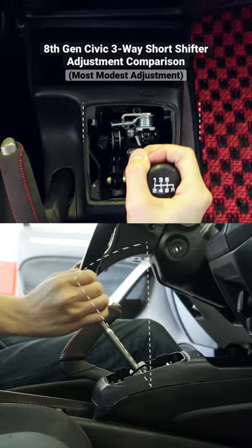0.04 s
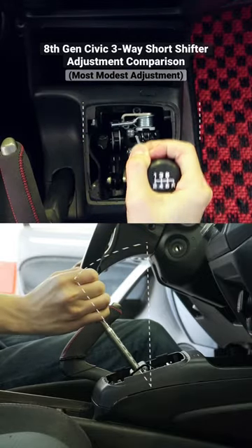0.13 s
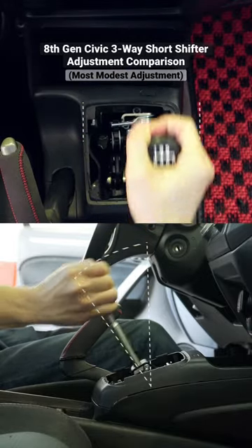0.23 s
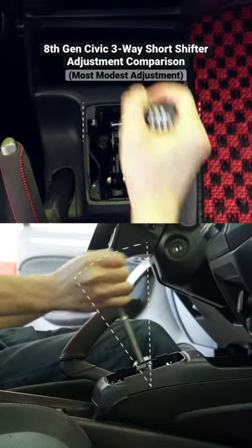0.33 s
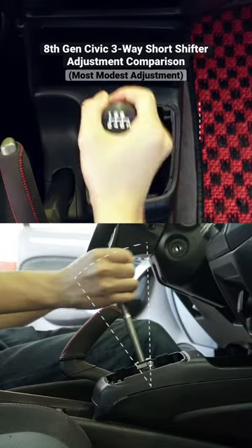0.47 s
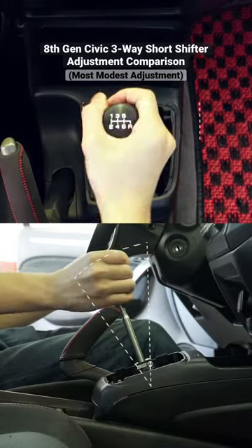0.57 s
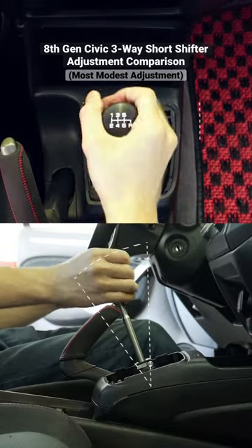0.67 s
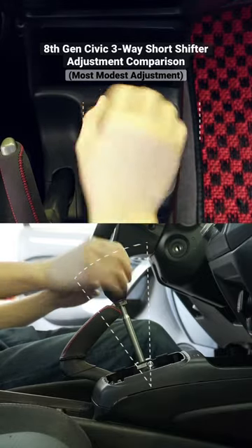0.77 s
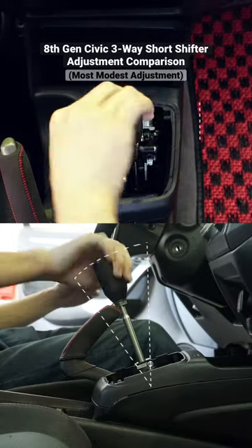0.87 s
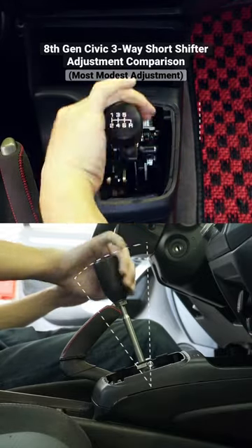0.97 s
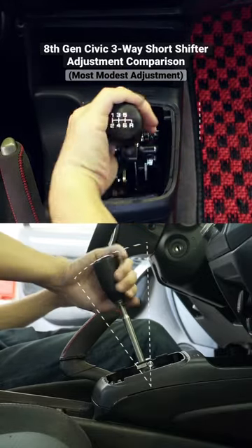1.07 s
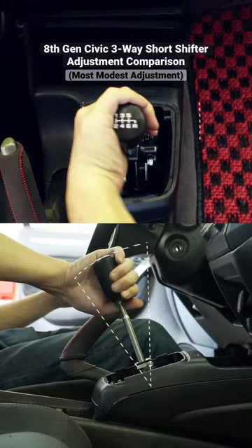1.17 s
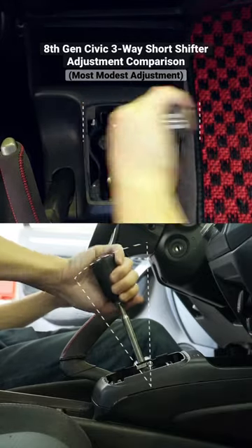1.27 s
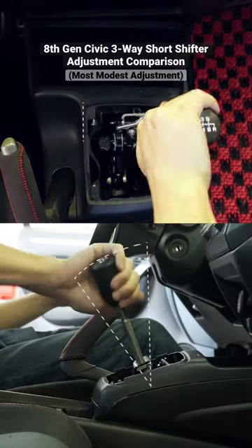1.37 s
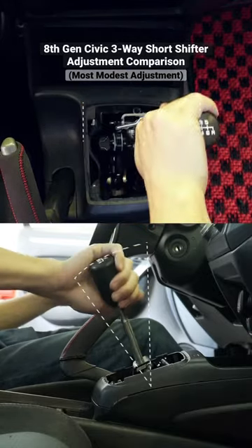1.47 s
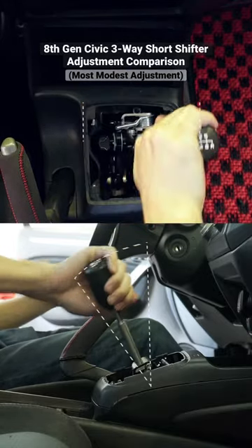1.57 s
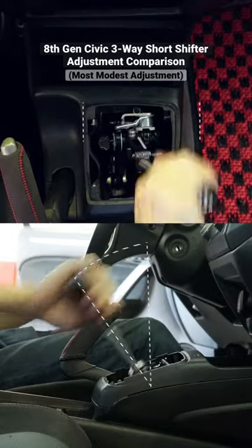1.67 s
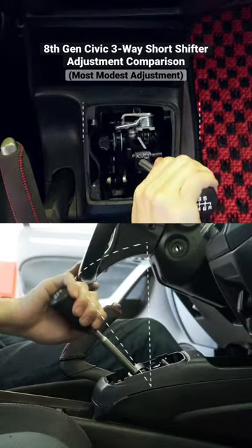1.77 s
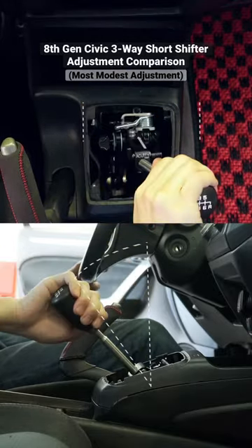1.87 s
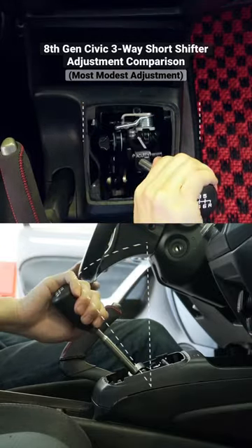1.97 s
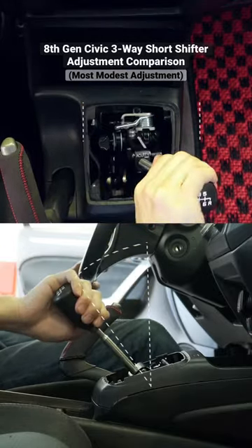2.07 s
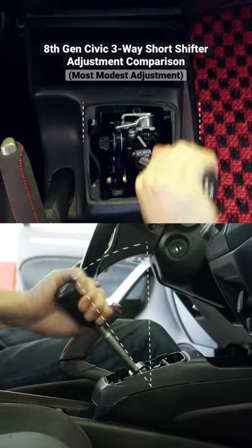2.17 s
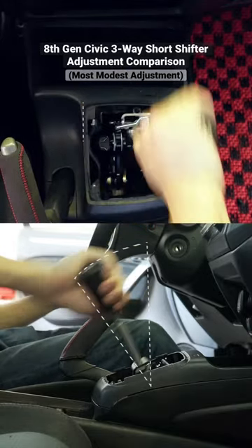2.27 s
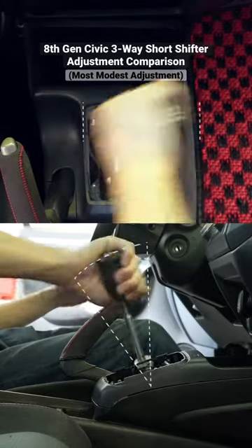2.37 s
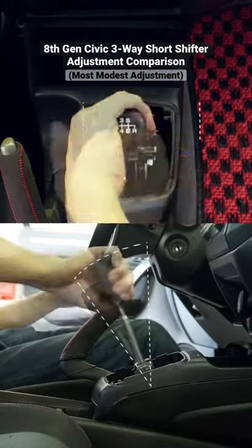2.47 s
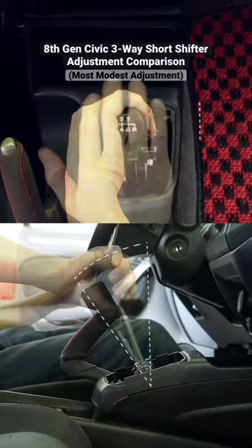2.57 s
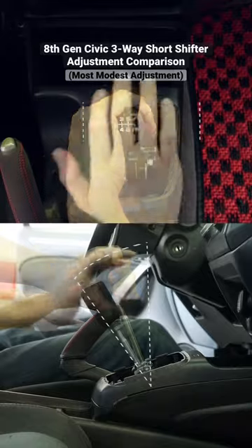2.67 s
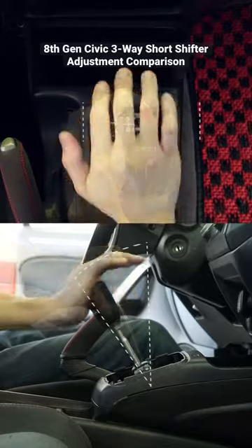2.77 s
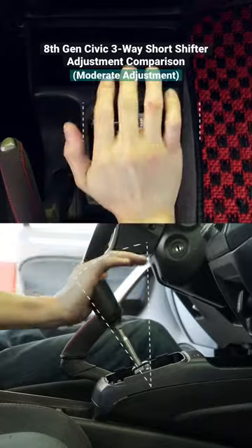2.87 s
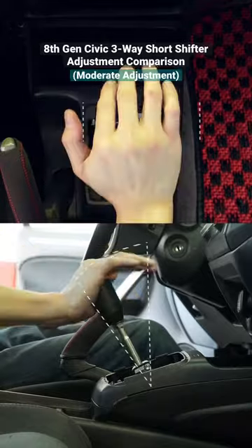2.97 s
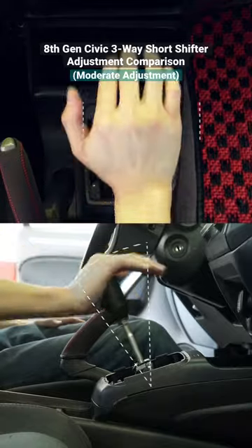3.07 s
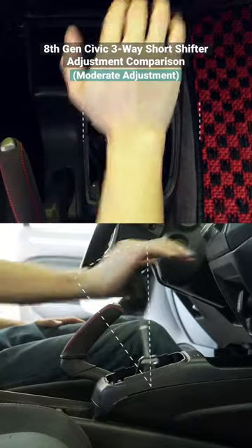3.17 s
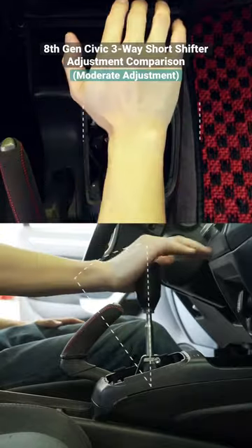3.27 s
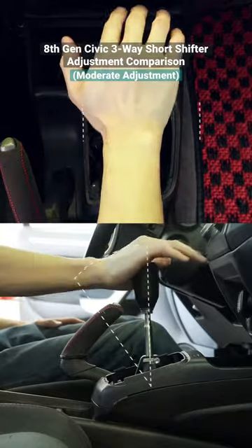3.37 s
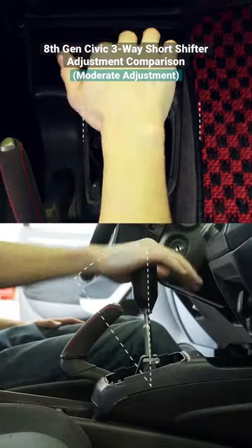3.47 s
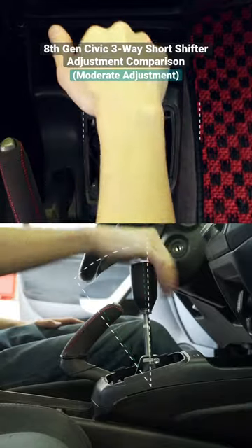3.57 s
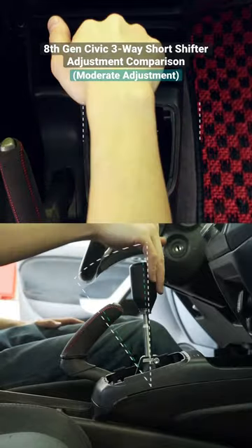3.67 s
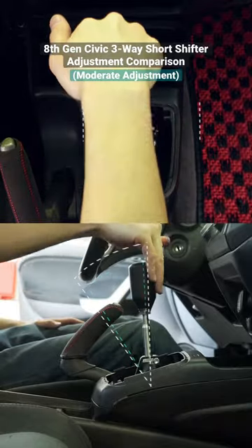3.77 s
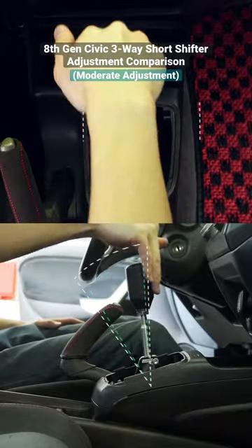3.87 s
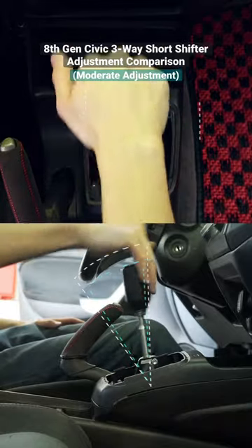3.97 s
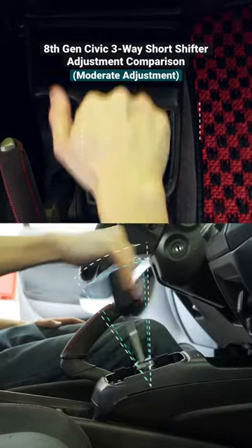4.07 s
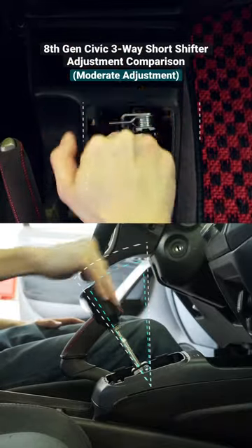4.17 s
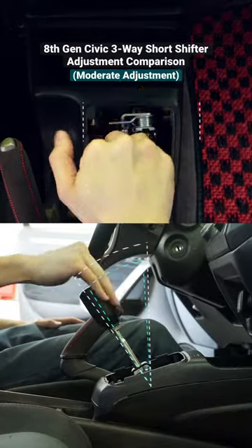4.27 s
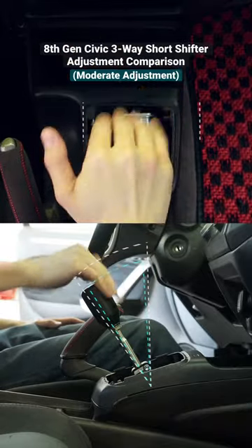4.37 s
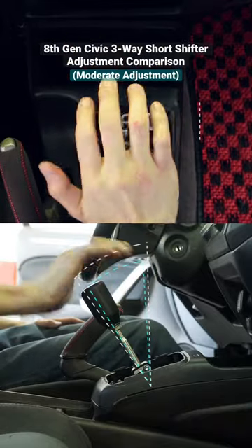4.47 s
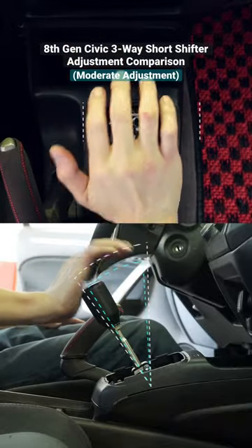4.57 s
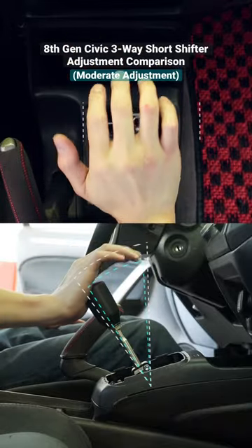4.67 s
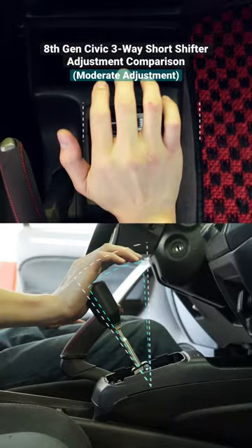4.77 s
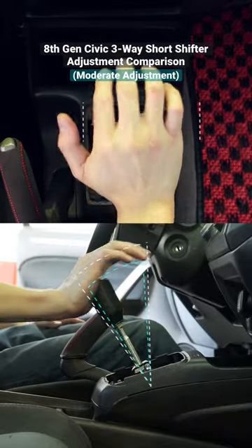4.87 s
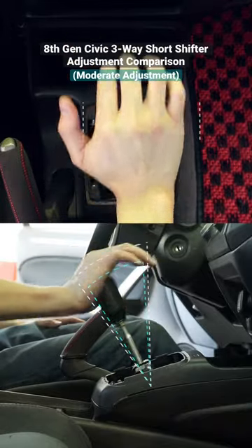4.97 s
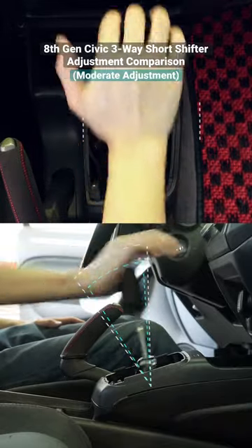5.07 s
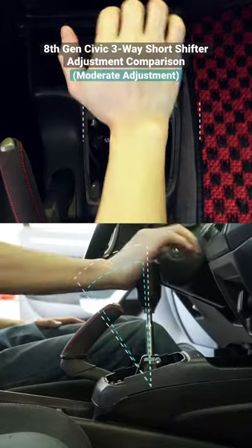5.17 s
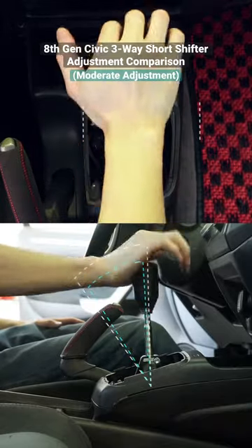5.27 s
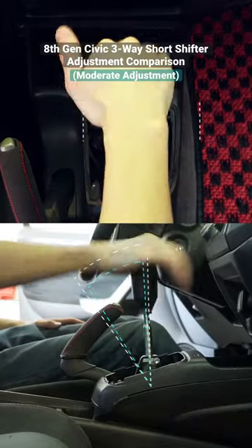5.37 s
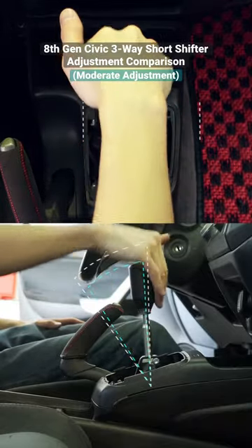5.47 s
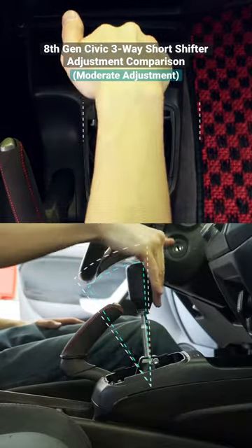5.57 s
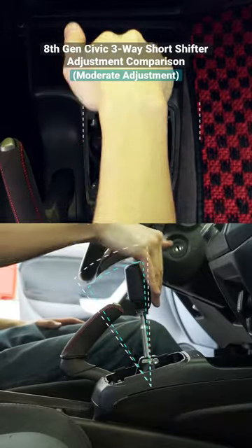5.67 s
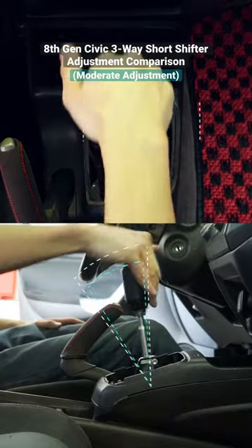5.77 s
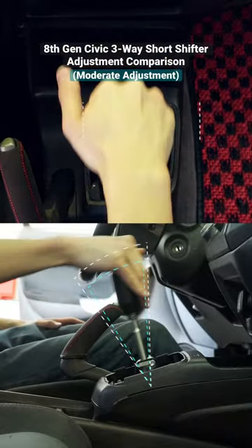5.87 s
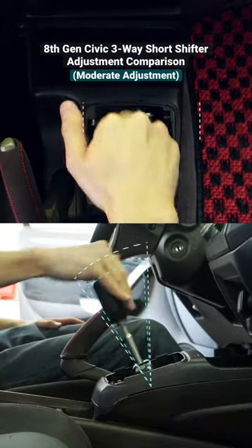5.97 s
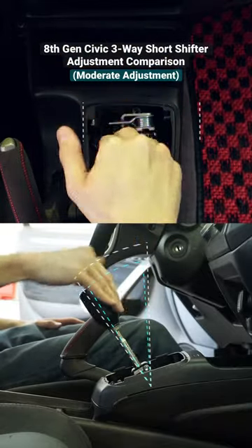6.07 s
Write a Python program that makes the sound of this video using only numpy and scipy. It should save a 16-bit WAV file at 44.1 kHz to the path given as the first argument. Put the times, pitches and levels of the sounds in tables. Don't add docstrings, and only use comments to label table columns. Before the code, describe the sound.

A hand-held microphone near the lever catches dry linkage ticks and low thumps in the console, while the gearbox's steel clacks return as dense garage echo. Early shifts are modest, reverse cracks sharply, and later shifts are paired snap-and-clunk blows, loudest just after three and four seconds. Low cabin rumble, slight hiss and remote traffic continue underneath.

```python
import sys
import numpy as np
from scipy import signal
from scipy.fft import rfft, irfft, next_fast_len
from scipy.io import wavfile
from scipy.ndimage import uniform_filter1d

SR = 44100
rng = np.random.default_rng(int(sys.argv[2]) if len(sys.argv) > 2 else 0)


def nominal_scale(level):
    x = np.asarray(level, float) / 20
    return 10 ** x


def unload_wav(signal):
    wavfile.write(
        sys.argv[1],
        SR,
        np.round(np.clip(np.atleast_2d(signal).T, -1, 1) * 32767).astype(np.int16),
    )


N = 270333


def read(table, hz):
    at, value = np.transpose(table)
    return np.interp(np.log(np.maximum(hz, 1)), np.log(at), value)


def shape(x, gain):
    y = irfft(rfft(x) * gain(np.fft.rfftfreq(x.shape[-1], 1 / SR)), x.shape[-1])
    return y / np.sqrt(np.mean(y ** 2))


def colour(table):
    below = (table[0][0] / 2, table[0][1] - 30)
    above = (table[-1][0] * 2, table[-1][1] - 30)
    ends = [below] + list(table) + [above]
    return lambda hz: nominal_scale(read(ends, hz))


# (frequency [Hz], correlation [0-1])
CHANNEL_LIKENESS = [(100, 0.99), (300, 0.93), (700, 0.73), (2000, 0.64), (5000, 0.6), (9000, 0.35),
                    (13000, 0.32)]


def pair(size, gain):
    like = np.clip(read(CHANNEL_LIKENESS, np.fft.rfftfreq(size, 1 / SR)), 0, 1)
    mid, side = rfft(rng.standard_normal((2, size)))
    mid = mid * np.sqrt(1 + like)
    side = side * np.sqrt(1 - like)
    return shape(irfft(np.array([mid + side, mid - side]), size), gain)


def steady(table):
    return pair(next_fast_len(N), colour(table))[:, :N]


def walk(rate):
    hold = int(SR / rate)
    levels = np.repeat(rng.standard_normal(N // hold + 1), hold)
    return 1.3 * uniform_filter1d(uniform_filter1d(levels, hold), hold)[:N]


def add(track, s, x):
    i = max(int(s * SR), 0)
    track[i:i + len(x)] += x[:len(track) - i]


def ring(t, modes):
    return sum(nominal_scale(db) * np.sin(2 * np.pi * hz * t) * 1000 ** (-t / t60) for hz, db, t60 in modes)


def afterglow(events, t60):
    kicks = np.zeros(N)
    for s, db, *_ in events:
        kicks[int(s * SR)] += nominal_scale(2 * db)
    return signal.lfilter([1], [1, -1000 ** (-2 / (t60 * SR))], kicks)


# (frequency [Hz], density [dB per Hz])
HISS_COLOUR = [(2000, -20), (5000, 2.5), (12000, -2.5), (15500, 0.5)]


def hiss():
    return nominal_scale(-76.5) * steady(HISS_COLOUR)


# (time [s], tyre wash [dB], nearness [dB], left minus right [dB])
TRAFFIC_LEVELS = [(0.0, -48.5, -1.5, 0.5), (0.3, -62.5, 3, -6), (0.68, -58.5, -5, -2),
                  (1.07, -62, -4.5, -0.5), (1.55, -58.5, -4.5, -4), (2.05, -61, -2.5, 2),
                  (2.61, -53.5, -4, -1.5), (2.87, -51.5, 0.5, -1), (3.1, -51.5, -2, -2),
                  (3.46, -49, 0, -3.5), (3.67, -47, -1.5, 0), (3.95, -49.5, 2.5, -2.5), (4.3, -45, 4, -1.5),
                  (4.5, -45, 6, -1.5), (4.74, -49.5, 4.5, -2), (4.95, -49.5, 0, -2), (5.5, -57, -5, -1.5),
                  (5.8, -60.5, -3.5, -2.5), (6.13, -56, -3.5, 0.5)]


def traffic():
    s, *controls = np.transpose(TRAFFIC_LEVELS)
    return [np.interp(np.arange(N) / SR, s, control) for control in controls]


# (frequency [Hz], density [dB per Hz])
CABIN_BOOM = [(90, -19.5), (150, 5.5), (230, 5.5), (310, -1.5), (480, -9.5), (700, -44)]
# (frequency [Hz], density [dB per Hz])
FLOOR_RUMBLE = [(25, -17), (45, -5), (65, -2.5), (100, -6.5), (140, -20)]
# (time [s], level [dB])
LOW_SWELL = [
    (0.9, -2.5),
    (2.4, -3.5),
    (3.5, -3.5),
    (3.95, -0.5),
    (5.0, -1.5),
    (5.7, -9),
]


def cabin_and_floor():
    tyre_db = traffic()[0]
    blows = GEAR_THUDS + GATE_THUDS + HAND_NUDGES
    low_swell_db = np.interp(np.arange(N) / SR, *np.transpose(LOW_SWELL))
    wash_db = 0.3 * (tyre_db - tyre_db.mean())
    boom_power = nominal_scale(2 * (-59.5 + low_swell_db + wash_db)) + nominal_scale(2 * -29) * afterglow(blows, 0.97)
    rumble_power = nominal_scale(2 * (-66.5 + low_swell_db)) + nominal_scale(2 * -31.5) * afterglow(blows, 0.95)
    boom = steady(CABIN_BOOM) * np.sqrt(boom_power) * nominal_scale(1.8 * walk(13))
    rumble = steady(FLOOR_RUMBLE) * np.sqrt(rumble_power) * nominal_scale(2 * walk(38))
    return boom + rumble


# (frequency [Hz], density [dB per Hz])
TYRE_COLOUR = [(210, -38.5), (350, -11), (385, -19), (472, -7.5), (555, -15.5), (719, -11.5), (1020, -2),
               (1220, -5), (1420, -9.5), (2340, -13), (2540, -16.5), (4560, -26), (5670, -34.5),
               (9000, -61), (11700, -90), (19800, -120)]


def tyre_wash():
    tyre_db, near_db, pan_db = traffic()
    size = next_fast_len(N)
    road = rfft(pair(size, colour(TYRE_COLOUR)))
    centres_hz = [600, 1050, 1700, 3200]
    band_db = [-0.5 * near_db, near_db, 0, -1 - 0.13 * near_db]
    tyres = 0
    for row, db in zip(np.eye(4), band_db):
        share = read(list(zip(centres_hz, row)), np.fft.rfftfreq(size, 1 / SR))
        tyres = tyres + irfft(road * share, size)[:, :N] * nominal_scale(db + walk(14))
    return tyres * nominal_scale(tyre_db + np.array([pan_db, -pan_db]) / 2)


# (frequency [Hz], density [dB per Hz])
FAR_WALL = [(500, -8), (1100, -1.5), (2300, -1), (4500, -6.5), (7000, -26)]


def far_end():
    return steady(FAR_WALL) * np.sqrt(afterglow(SEATING_CLACKS, 0.96)) * nominal_scale(-20.5)


# (time [s], peak [dB], ring [Hz], edge above 6 kHz [dB], decay [s])
LINKAGE_TICKS = [(0.6444, -51, 1780, -20, 0.03), (0.6658, -43, 1720, -12, 0.02),
                 (0.7045, -41.5, 1760, -7, 0.016), (0.738, -50, 1720, -9, 0.02),
                 (0.748, -54, 1720, -5, 0.02), (1.1753, -33.5, 1706, 2, 0.035),
                 (1.2902, -44, 2170, -21.5, 0.045), (1.314, -29.5, 1600, -18, 0.05),
                 (1.57, -47, 1660, -11.5, 0.01), (1.658, -44, 1500, -1.5, 0.02),
                 (1.689, -30, 3400, 5, 0.071), (2.307, -27, 3400, -8.5, 0.04),
                 (2.7414, -48, 1660, -12, 0.021), (3.11, -36, 1500, -15, 0.03),
                 (3.9515, -44, 1680, -41, 0.022), (4.068, -37, 1300, -20.5, 0.033),
                 (5.773, -46, 2240, -14, 0.025)]


def linkage():
    t, out = np.arange(4096) / SR, np.zeros(N)
    for s, db, hz, edge_db, decay_s in LINKAGE_TICKS:
        spectrum = [(500, -4.5), (1200, 7.5), (3000, -2.0), (5500, -1.0),
                    (8000, edge_db), (11000, edge_db - 14.5), (15000, 2 * edge_db - 15)]
        crack = shape(rng.standard_normal(len(t)), colour(spectrum)) * 1000 ** (-t / decay_s)
        small_ring = ring(t, [(hz, 0, 0.85 * decay_s)]) * (1 - np.exp(-t / 0.00092))
        tick = 0.62 * crack + 0.88 * small_ring
        add(out, s, nominal_scale(db) * tick * (1 - np.exp(-t / 0.00093)))
    return out


# (time [s], pitch [Hz], level [dB], t60 [s])
SINGING_PARTS = [(0.35, 2520, -39, 0.31), (.355, 4470, -40, .35), (1.28, 433, -39.5, 0.51),
                 (2.308, 3450, -21, 0.13), (2.31, 2130, -29, 0.5), (3.124, 4300, -36, 0.33),
                 (4.08, 4200, -38, 0.23), (4.076, 2700, -40, .3), (4.146, 480, -27, 0.12),
                 (4.153, 1290, -30.5, 0.62), (4.18, 2580, -29.5, 0.53), (4.17, 3500, -39, 0.22),
                 (4.215, 440, -40, 0.53), (1.7, 1070, -34.5, 0.45), (5.898, 2900, -35, .4),
                 (1.75, 4100, -31.5, 0.81), (6.008, 4400, -38, .3), (6.015, 2900, -35, 0.7)]


def singing():
    size = SR // 2
    t, out = np.arange(size) / SR, np.zeros((2, N))
    for s, hz, db, t60 in SINGING_PARTS:
        cluster = 0.7 * pair(size, lambda f: 1 / (1 + ((f - hz) / (40 + 0.034 * hz)) ** 4))
        if hz < 3000:
            cluster = cluster + 0.45 * np.sin(2 * np.pi * hz * t)
        envelope = (1 - np.exp(-t / 0.004)) * 1000 ** (-t / t60)
        for track, x in zip(out, cluster):
            add(track, s, nominal_scale(db) * x * envelope)
    return out


# (frequency [Hz], level [dB], t60 [s])
FLOOR_PAN = [(46, -2.5, 0.17), (72.3, 5, 0.2), (103.4, 0, 0.33)]
CONSOLE_BODY = [(162.2, -8, 0.17), (231.3, -5.5, 0.12), (290, -5, 0.15)]
UPPER_PANELS = [(342, -11, 0.03), (440, -15, 0.1), (478.6, -16.5, 0.1), (566.7, -22.5, 0.16),
                (650, -28, 0.059), (814, -34, 0.081), (1088, -16.5, 0.04)]
# (time [s], peak [dB], ring [Hz], upper panels [dB], shake [ms])
GEAR_THUDS = [(0.346, -28.5, 206, 1, 19), (0.394, -31, 305, 4, 17), (0.408, -28, 165, -3, 12),
              (0.433, -21.5, 217, 5, 12), (0.457, -22, 175, 5, 12), (0.46, -27, 290, 0.5, 12),
              (0.476, -33, 130, 0, 12), (3.11, -27, 191, 2, 15), (3.135, -30, 170, -5, 16),
              (3.162, -21.5, 240, -1, 11), (3.166, -25.5, 155, -2, 14), (3.18, -21.5, 255, 7, 10),
              (3.189, -18, 165, 0, 27), (3.226, -29, 219.5, 1, 8.3), (4.068, -28, 176.7, 2.5, 15),
              (4.076, -32.5, 480, 0, 11), (4.099, -32.5, 163, -2, 13), (4.14, -28.5, 192, 8, 7.8),
              (4.156, -19, 292, 12, 14.7), (4.158, -17.5, 157, -4, 25), (4.192, -27.5, 222, 4.5, 13.5),
              (5.036, -28.5, 205, 5, 17), (5.058, -31, 220, 1, 10), (5.082, -27, 290, 4, 6),
              (5.086, -21, 219, 6, 13), (5.11, -19, 156.3, 4, 31), (5.902, -26.5, 482, 3, 19),
              (5.904, -29, 290, -3, 13), (5.916, -37, 80, -5, 18), (5.996, -29.5, 480, 4, 14),
              (6.016, -24.5, 467, -4, 17), (6.016, -16, 155.3, 2.5, 26), (6.02, -27, 340, -2, 12),
              (6.036, -28, 270, 0, 12), (6.058, -30.5, 272, -3, 16), (6.088, -31.5, 160, 4, 18),
              (6.11, -31.5, 115, -5, 14)]
# (time [s], peak [dB], ring [Hz], upper panels [dB], shake [ms])
GATE_THUDS = [(1.207, -37, 200, -12, 8), (1.252, -37, 138, -3, 14), (1.222, -37, 170, -12, 8),
              (1.24, -40, 170, -12, 6), (1.281, -30, 190, -14, 8), (1.298, -26, 150, -14, 12),
              (1.311, -25, 270, -1, 7), (1.314, -16, 195, -2, 12), (1.33, -28, 150, -3, 8),
              (1.343, -25, 128.6, -5, 12), (1.352, -22.5, 178, 6, 11), (1.358, -33, 258, -3, 11),
              (1.373, -31, 431, 2, 16), (1.372, -29, 140, -3, 12), (1.392, -37, 125, -6.5, 16),
              (1.663, -27, 205, -16, 8), (1.682, -19.5, 215, 2.5, 15), (1.695, -28.5, 85, -8.5, 16),
              (1.727, -26.5, 148, -10, 14), (1.756, -32.5, 150, -2, 10), (2.192, -38, 170, -5, 20),
              (2.232, -35, 212, -9, 16), (2.264, -28.5, 298, 2, 28), (2.27, -26, 158, 5, 41),
              (2.308, -33, 90.7, -4, 14), (2.335, -26, 105, -1, 14), (2.345, -33, 204, 4, 12),
              (2.38, -32.5, 101, -3, 16), (2.402, -28.5, 227, -7, 16), (2.405, -25, 160, -9, 25),
              (2.452, -35, 145, 5, 15)]
# (time [s], peak [dB], ring [Hz])
HAND_NUDGES = [(0.009, -44, 217), (0.058, -43, 190), (0.165, -41, 150), (0.198, -42.5, 229),
               (0.497, -38.5, 146), (1.181, -38.5, 174.6), (0.676, -42, 166), (1.467, -55, 140),
               (1.57, -44, 152), (2.519, -45.5, 133), (2.893, -42.5, 166), (3.001, -60.5, 162),
               (3.285, -36, 170), (3.593, -48, 223), (3.813, -47.5, 227), (4.228, -34, 151),
               (4.259, -38, 302), (4.33, -40, 304), (4.685, -48, 240.5), (4.837, -40, 168),
               (5.179, -32, 144), (5.227, -45, 189), (5.159, -34, 170), (5.21, -36, 141)]


def console():
    t, out = np.arange(SR // 3) / SR, np.zeros(N)
    thuds = [(*row, 1) for row in GEAR_THUDS] + [(*row, 4.5) for row in GATE_THUDS]
    thuds = thuds + [(*row, -4.5, 8.5, 2) for row in HAND_NUDGES]
    mount = signal.butter(3, 115, "high", fs=SR, output="sos")
    body = signal.sosfilt(mount, ring(t, CONSOLE_BODY))
    panels = signal.sosfilt(mount, ring(t, UPPER_PANELS))
    pan = ring(t, FLOOR_PAN) * (1 - np.exp(-t / 0.01))
    for s, db, hz, panels_db, shake_ms, pan_db in thuds:
        struck = ring(t, [(hz, 0, 0.4)]) * (1 - np.exp(-(t / 0.0047) ** 2))
        struck = struck * np.exp(-np.maximum(t - shake_ms / 1000, 0) / 0.009)
        add(out, s, struck * nominal_scale(db - 2.0))
        u = t[:2048] / (0.6 * shake_ms / 1000)
        push = u * np.exp(-2 * u) * uniform_filter1d(rng.standard_normal(2048), size=12)
        floor_db = pan_db - 0.27 * panels_db - 28
        for part, part_db in [(body, -14), (panels, panels_db - 10.5), (pan, floor_db)]:
            blow = signal.fftconvolve(part, push)
            add(out, s - 0.00395, blow * nominal_scale(db + part_db) / np.abs(blow).max())
    return out


# (frequency [Hz], t60 [s])
GARAGE_ECHO = [(400, 0.42), (1000, 0.48), (2500, 0.52), (5000, 0.48), (9000, 0.39), (14000, 0.19)]


def gearbox(clacks, steel, resonances, hold_s, edge_db, edge_per_casing):
    size = next_fast_len(N)
    t, freq = np.arange(SR) / SR, np.fft.rfftfreq(size, 1 / SR)
    rings = 1 + sum(nominal_scale(db) / (1 + (2 * (freq - hz) / width) ** 2) for hz, width, db in resonances)
    echoes = rfft(pair(size, lambda f: colour(steel)(f) * rings))
    streaks = rng.standard_normal(SR // 80 + 2)
    echoes = echoes * nominal_scale(2.5 * np.interp(freq / 40, np.arange(len(streaks)), streaks))
    fall = np.sqrt(t ** 2 + hold_s ** 2) - hold_s
    strike = 1 + nominal_scale(-4) * np.exp(-t / 0.0051)
    out = 0
    for hz in 250 * 2 ** np.arange(0, 6.5, 0.5):
        window = np.sqrt(np.clip(1 - 2 * np.abs(np.log2(np.maximum(freq, 1) / hz)), 0, 1))
        band = irfft(echoes * window, size)[:, :N]
        tail = (strike * 1000 ** (-fall / read(GARAGE_ECHO, hz))) ** 2
        power = np.zeros(N)
        for s, db, casing_db, fork_db, swell_ms in clacks:
            swell = swell_ms / 1000
            rise = (1 - np.exp(-t / swell)) ** 4
            tilt = [(1000, casing_db), (2300, fork_db), (4300, 0),
                    (9000, edge_db + edge_per_casing * casing_db)]
            add(power, s - swell / 2, tail * rise * nominal_scale(db - 6 + read(tilt, hz)) ** 2)
        out = out + band * np.sqrt(power) * nominal_scale(walk(150))
    return out


# (time [s], level [dB], casing near 1 kHz [dB], fork near 2.3 kHz [dB], swell [ms])
RELEASE_CLACKS = [(0.1844, -58.5, 19.5, 1.5, 5.8), (0.3223, -35.5, 2.5, -2.5, 9.1),
                  (0.353, -32.5, 4.5, -6, 9.2), (1.175, -64, 22.5, 9, 3.5), (2.1844, -38, 8, -4.5, 15.4),
                  (2.2074, -32, 1, -4, 34), (3.104, -33.5, 10, -7, 5.4), (3.1183, -23.5, -18.5, -4.5, 8.63),
                  (4.0564, -29, 4.5, -5, 9.7), (4.0791, -26.5, -4, -1.5, 5.7),
                  (5.0322, -28.5, 7.5, -3.5, 12), (5.0455, -21, -12, -12.5, 11), (5.885, -27.5, 0, -6, 18),
                  (5.91, -28, 0.5, -2, 34)]
# (frequency [Hz], density [dB per Hz])
RELEASE_COLOUR = [(240, -32), (400, -5), (511, -7), (834, -14.5), (1080, -5), (1610, -4), (2190, 1),
                  (2840, 0.5), (3300, -4), (4560, -3), (6000, -15), (10300, -26.5), (15500, -48)]
# (frequency [Hz], width [Hz], level [dB])
RELEASE_MODES = [(2940, 140, -11.5), (4620, 180, -10), (5600, 390, 3), (9000, 300, -6)]


def release():
    return gearbox(RELEASE_CLACKS, RELEASE_COLOUR, RELEASE_MODES, 0.09, 1.0, -0.026)


# (time [s], level [dB], casing [dB], fork [dB], swell [ms])
REVERSE_CLACKS = [
    (1.658, -34.5, 14.5, 8, 9.4),
    (1.676, -20, 8, -3.5, 7),
    (1.688, -16, -1.5, -8.5, 1.4),
    (1.745, -23.5, 4.5, -4, 12),
    (2.272, -34.5, -1, 10.5, 3.7),
    (2.303, -20, 3, 2, 2.2),
]
# (frequency [Hz], density [dB per Hz])
REVERSE_COLOUR = [(240, -27), (400, -16), (749, -16.5), (1130, -6), (1400, -5), (1710, -1.5), (2790, -1.5),
                  (4350, -1), (6190, -5.5), (7100, -11), (10400, -19), (12700, -29), (15500, -56.5)]
# (frequency [Hz], width [Hz], level [dB])
REVERSE_MODES = [(1140, 130, -14), (1980, 130, -5.5), (3450, 510, -5), (3930, 180, -6), (4450, 190, -5),
                 (6100, 450, -7.5)]


def reverse():
    return gearbox(REVERSE_CLACKS, REVERSE_COLOUR, REVERSE_MODES, 0.09, 2.5, -1.14)


# (time [s], level [dB], casing [dB], fork [dB], swell [ms])
SEATING_CLACKS = [(0.4374, -38.5, 12.5, 8.5, 4.9), (0.462, -35.5, 1, -24, 3), (1.2895, -56, 0, 8, 9.9),
                  (1.3124, -39.5, 16, 2.5, 5.6), (2.3974, -39, 7.5, 16, 2.1), (3.1644, -20, 1.5, -4, 14),
                  (3.188, -13, -2.5, -7, 40), (4.1524, -18.5, 1, -3.5, 7.5), (4.172, -14, 0, -7, 76),
                  (5.098, -19, 1, -3, 8.5), (5.1224, -18.5, -7.5, -2, 24), (5.9983, -19.5, 0.5, -5.5, 13.4),
                  (6.0244, -24.5, -0.5, -5, 8), (6.0894, -30.5, -9, -2, 9.2)]
# (frequency [Hz], density [dB per Hz])
SEATING_COLOUR = [(240, -17), (400, 3.5), (653, -7.5), (1030, -7.5), (1300, -2), (1630, -2.5), (2590, 0.5),
                  (3300, -3), (4630, -3), (6380, -13), (9210, -20), (11800, -28), (15500, -60)]
# (frequency [Hz], width [Hz], level [dB])
SEATING_MODES = [(1290, 29, -15), (2094, 73, -8), (2580, 49, -14), (3920, 88, -4.5), (4910, 150, -13),
                 (8100, 330, -6.5)]


def seating():
    return gearbox(SEATING_CLACKS, SEATING_COLOUR, SEATING_MODES, 0.0071, -0.5, 0.5)


def scene():
    background = hiss() + cabin_and_floor() + tyre_wash() + far_end()
    close = linkage() + singing() + console()
    pan_db = -0.35
    clacks = (release() + reverse() + seating()) * nominal_scale(np.array([[pan_db], [-pan_db]]) / 2)
    return background + close + clacks


def low_pass(x):
    return signal.sosfilt(signal.butter(12, 15500, fs=SR, output="sos"), x)


def record(dry):
    top_cut = signal.ellip(8, 0.2, 60, 15600, fs=SR, output="sos")
    bass_cut = signal.butter(3, 45, "high", fs=SR, output="sos")
    mix = signal.sosfilt(bass_cut, signal.sosfilt(top_cut, dry))
    return low_pass(mix)


dry = scene()
out = record(dry)
unload_wav(out)
```